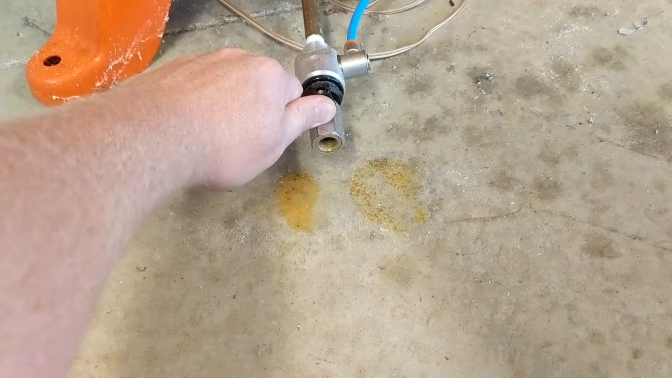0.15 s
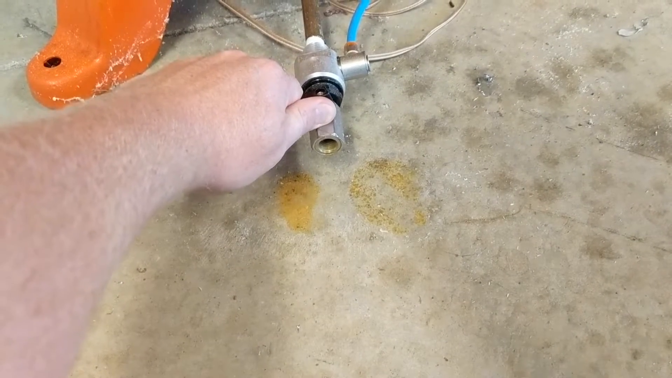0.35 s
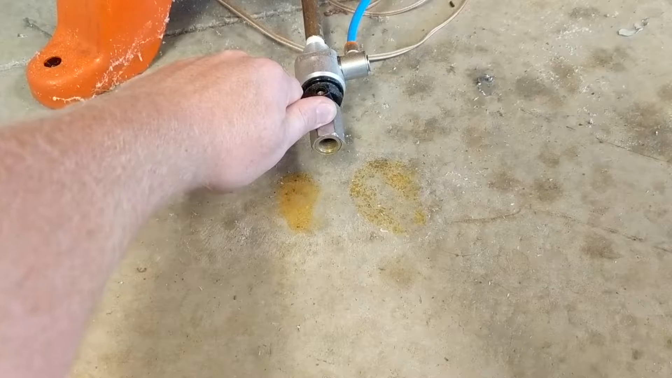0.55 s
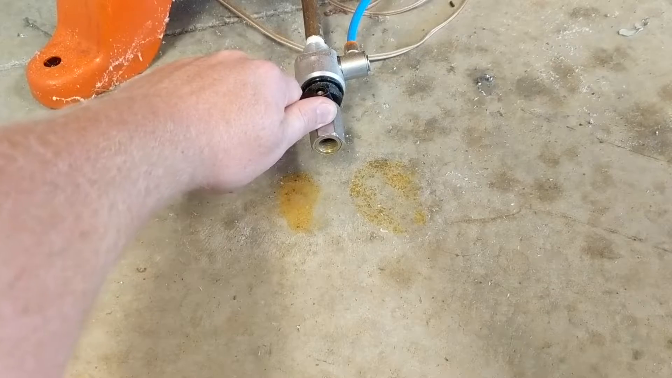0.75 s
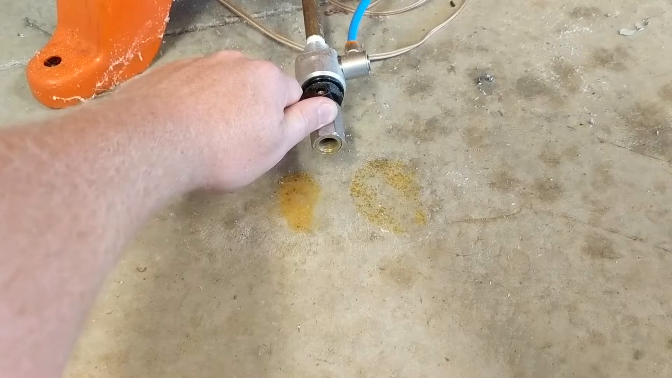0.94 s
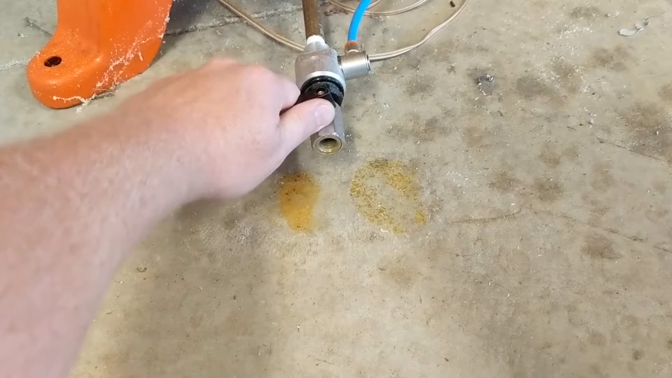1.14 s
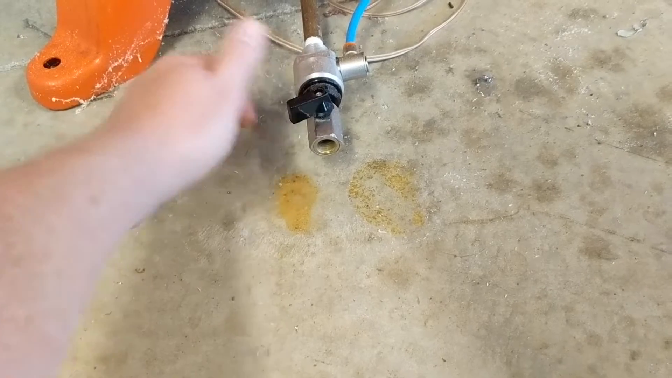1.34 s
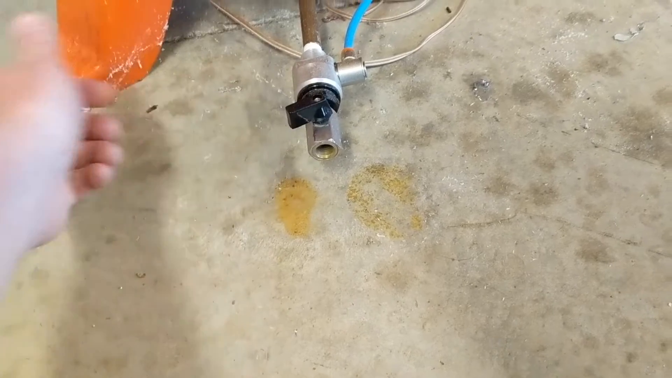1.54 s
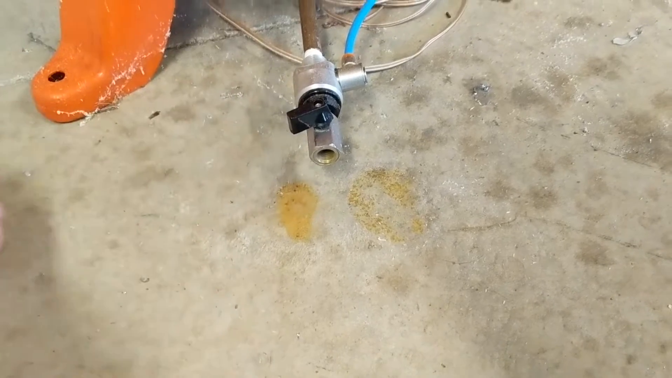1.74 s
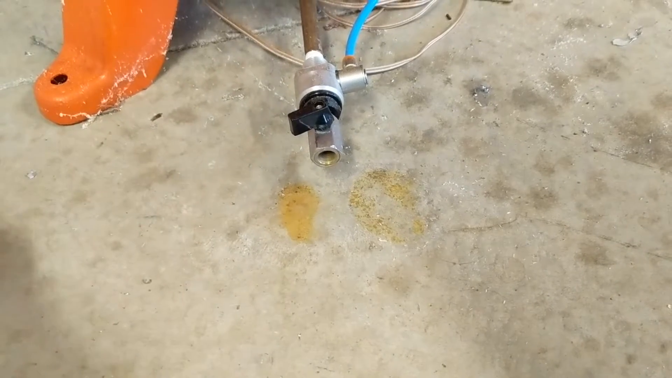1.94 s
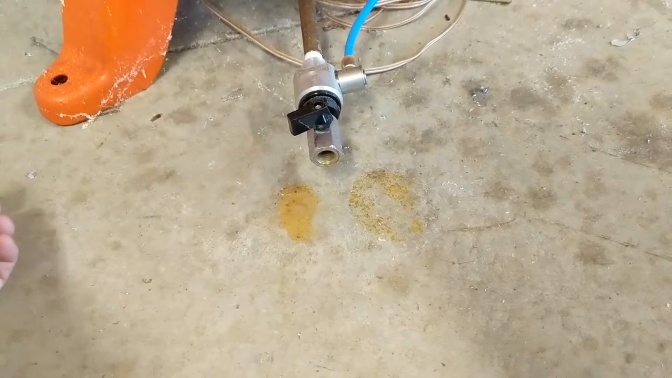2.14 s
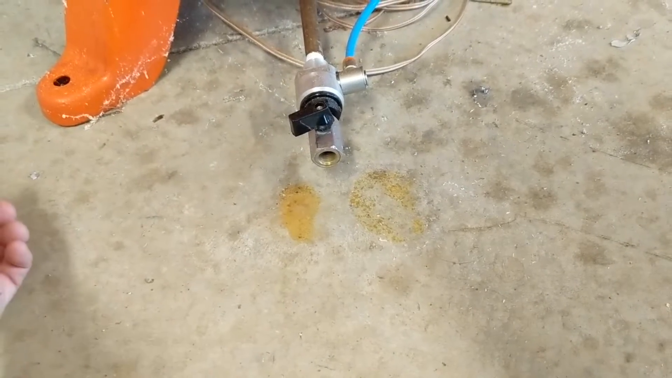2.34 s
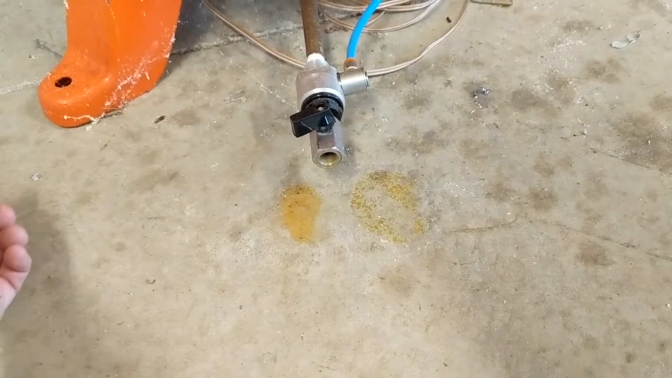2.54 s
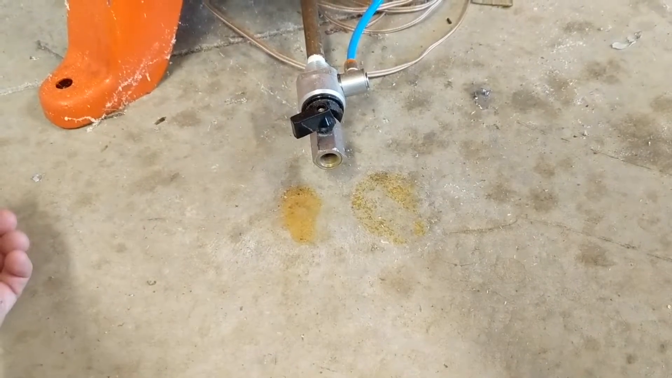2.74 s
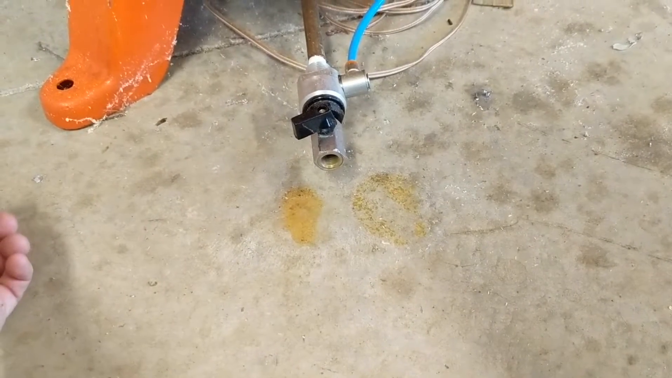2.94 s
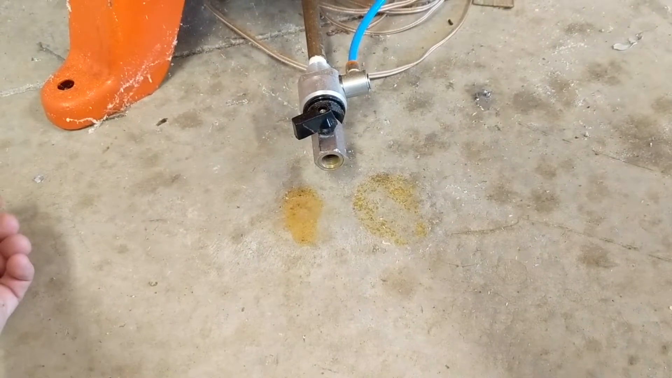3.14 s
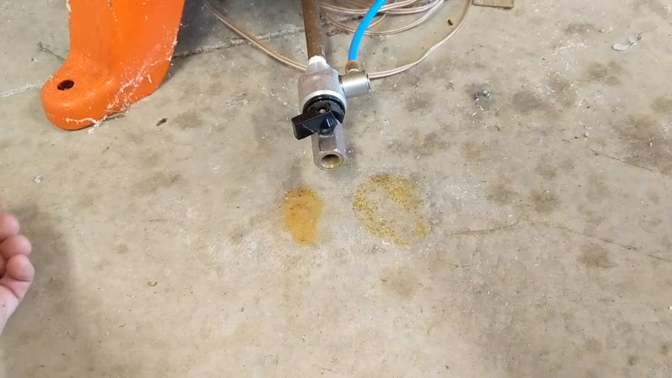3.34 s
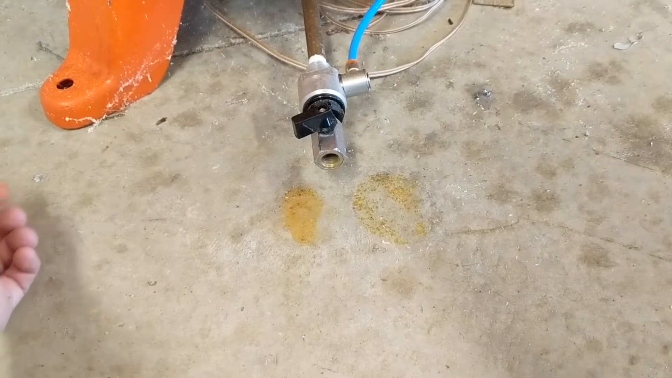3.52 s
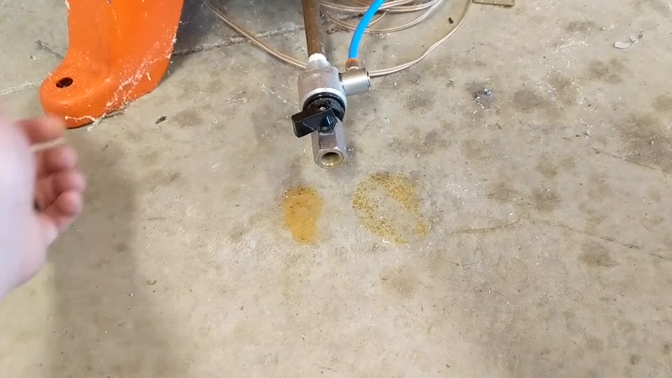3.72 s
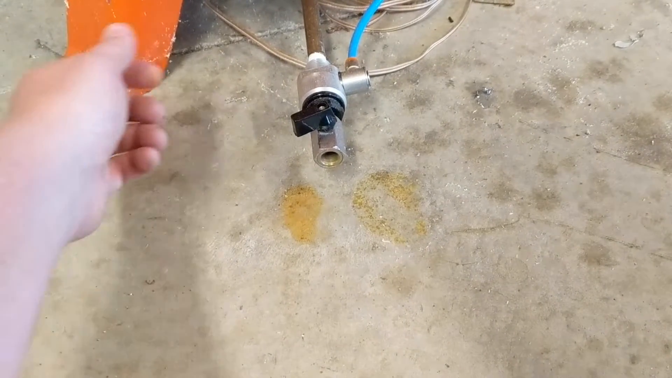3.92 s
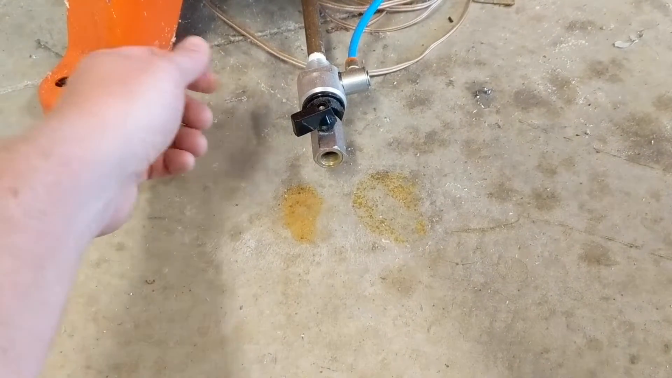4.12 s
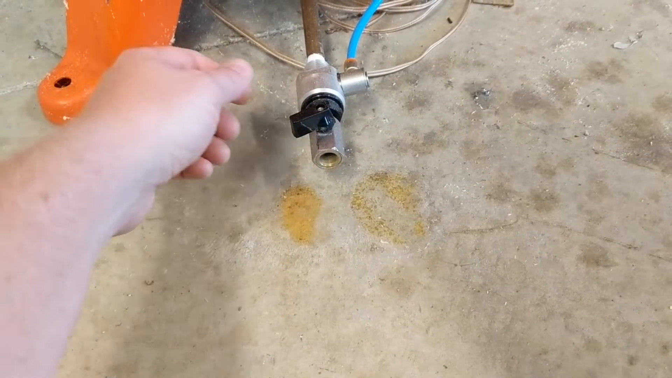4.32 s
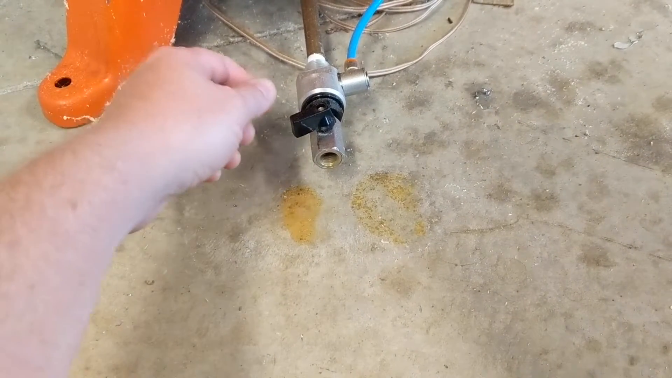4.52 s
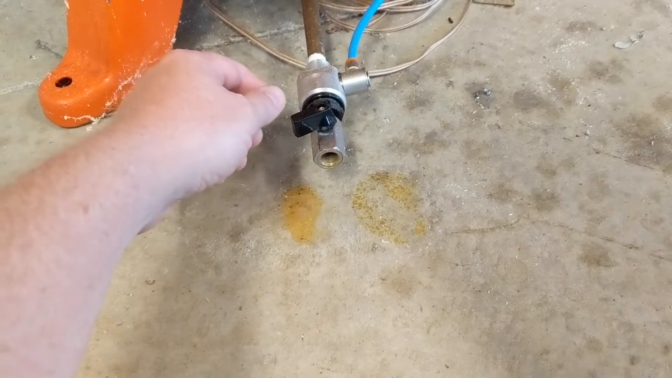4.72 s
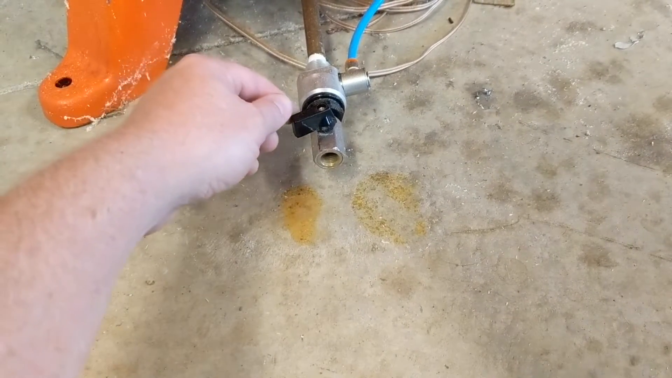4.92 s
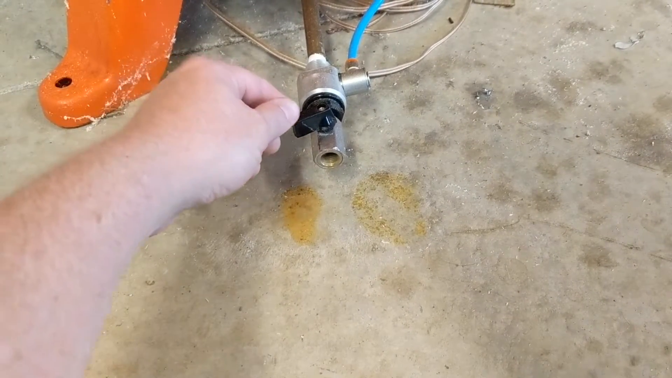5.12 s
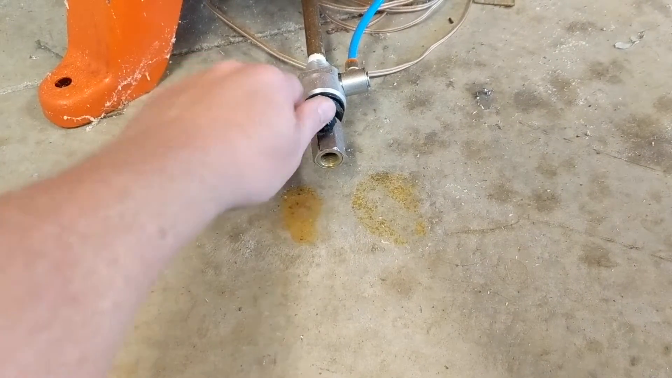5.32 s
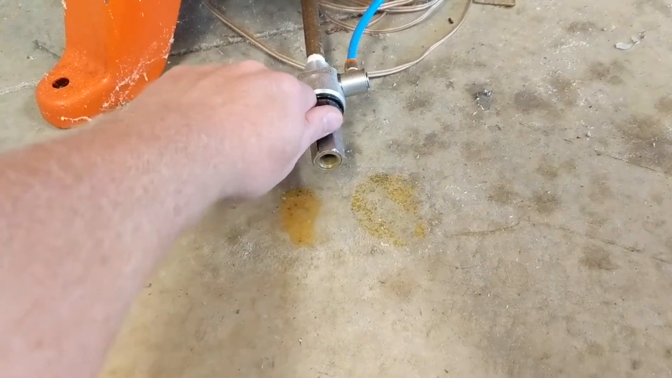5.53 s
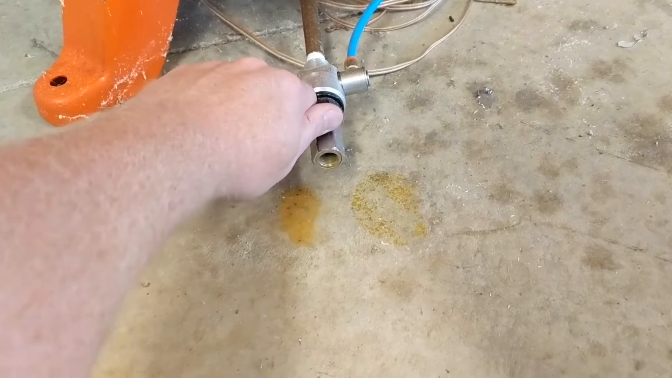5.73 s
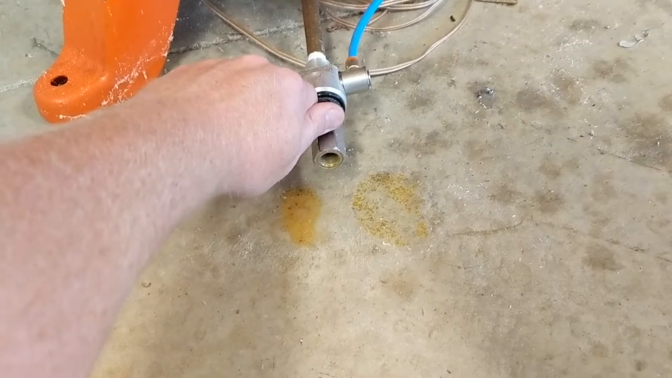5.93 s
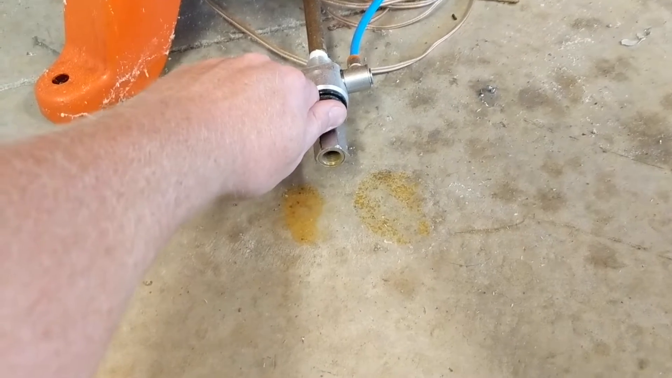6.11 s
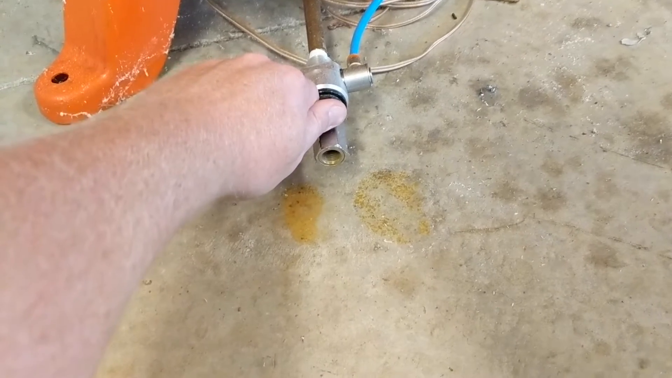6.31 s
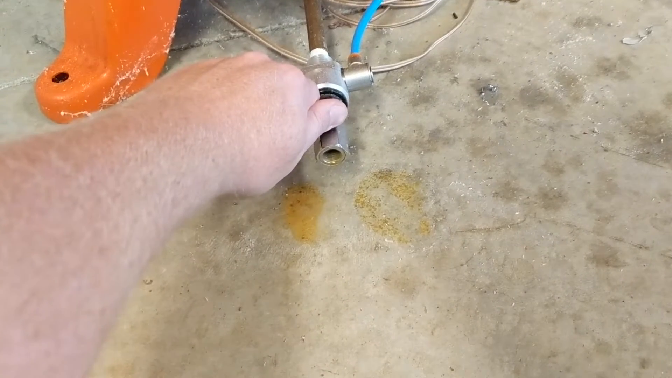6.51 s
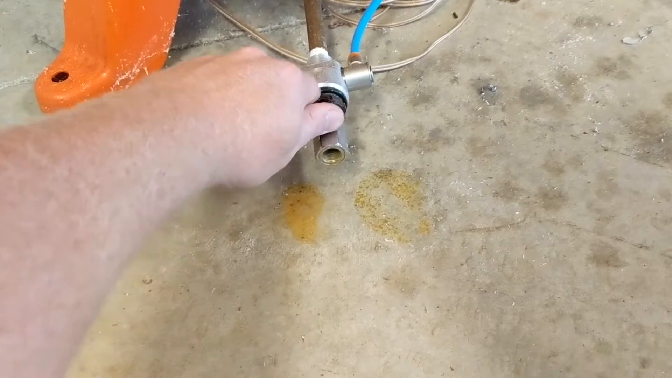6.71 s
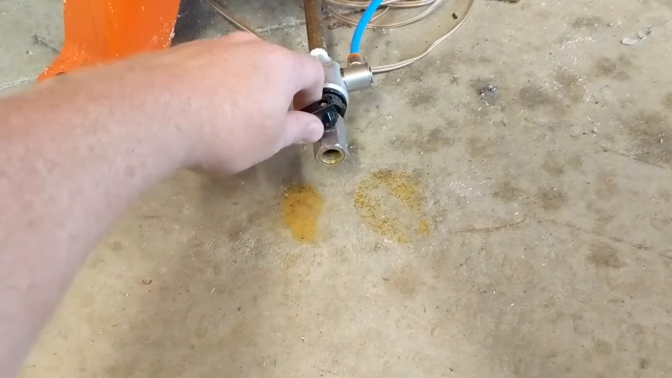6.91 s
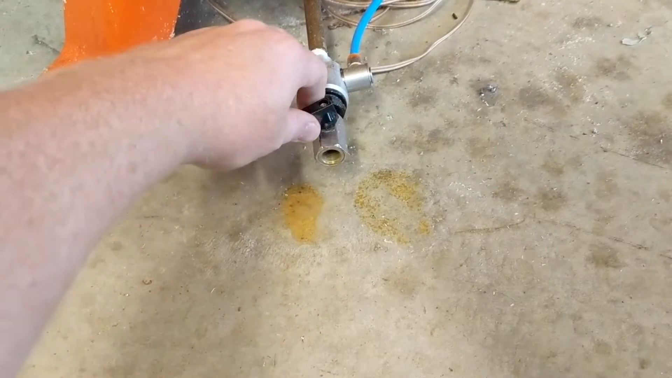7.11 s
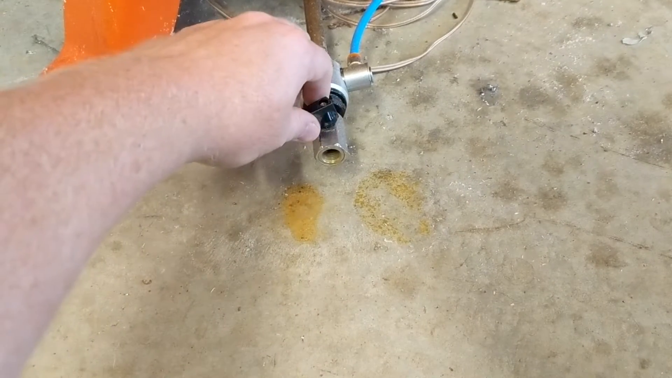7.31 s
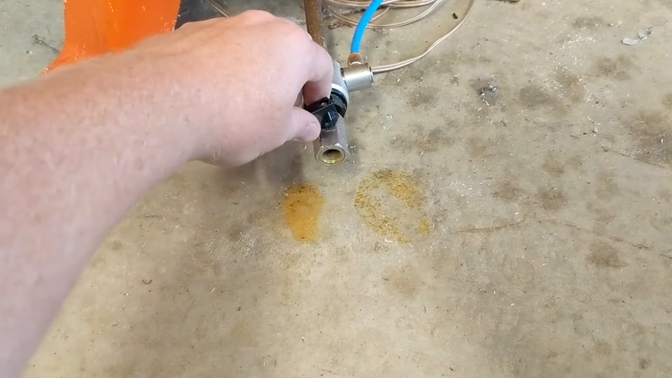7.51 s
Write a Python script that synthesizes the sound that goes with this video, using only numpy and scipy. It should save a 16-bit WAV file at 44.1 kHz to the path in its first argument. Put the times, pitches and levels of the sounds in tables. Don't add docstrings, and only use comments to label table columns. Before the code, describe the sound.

A close, bright hiss of escaping air bursts from a short pipe, holds steady, then jumps louder and sputters in gusts.

```python
import sys
import numpy as np
from scipy import signal
from scipy.fft import rfft, irfft, next_fast_len
from scipy.io import wavfile
from scipy.ndimage import uniform_filter1d

SR = 44100
rng = np.random.default_rng(int(sys.argv[2]) if len(sys.argv) > 2 else 0)


def inscribe(sig):
    pcm = np.round(np.clip(np.atleast_2d(sig).T, -1, 1) * 32767)
    wavfile.write(sys.argv[1], SR, pcm.astype(np.int16))


def invert_db(level):
    return 10 ** (np.asarray(level, dtype=float) / 20)


N = 337760


def jet():
    # time_s, level_db
    valve = [(0, -88), (.06, -62), (.12, -57.5), (.27, -40), (.31, -31.5), (.43, -27.5), (.65, -31),
             (1.4, -30), (1.9, -30.5), (3.1, -32), (3.62, -30.5), (4.1, -31.5), (4.5, -29.5), (5.95, -28),
             (6.11, -29), (6.15, -22), (7.66, -22.5)]
    # time_s, lift_db, length_ms
    swells = [(.58, 3, 32), (.85, 1.5, 60), (1.52, -4.5, 32), (1.76, 1.5, 85), (2.42, 1, 160),
              (3.74, 3.5, 70), (3.915, 3, 35), (3.96, -4.5, 15), (4.04, -4, 31), (6.01, -4.5, 22),
              (6.5, -1.5, 26), (6.8, 0.5, 80), (7.48, 1, 35)]
    # start_s, shear_minus_pipe_db, fine_minus_pipe_db
    poses = [(0, -1, -16.5), (.09, 0.5, -8), (.2, -3.5, -11), (.28, -12, -25.5), (.61, -10, -22.5),
             (1.4, -11, -17), (1.5, -6, -16), (1.6, -9, -19), (1.69, -7, -18.5), (1.78, -11, -20),
             (3.68, -8.5, -19), (3.92, -6.5, -19), (4.09, -7, -15), (4.42, -12, -18.5), (5.3, -7.5, -21.5),
             (6.17, -3, -18), (6.58, -2.5, -18), (6.87, -5, -17.5)]
    # frequency_hz, level_db_per_hz
    pipe_colour = [(2900.0, -36.0), (3060.0, -18.0), (3169.0, -13.4), (3514.0, -8.1), (4065.0, -2.2),
                   (4478.0, 0.0), (4680.0, -1.5), (4823.0, -9.0), (4990.0, -1.5), (5305.0, -2.9),
                   (5443.0, -5.5), (5719.0, -6.0), (6201.0, -13.6), (6401.0, -26.0)]
    # frequency_hz, level_db_per_hz
    shear_colour = [(6070, -16), (6270, -3.5), (6683, -1.6), (7028, -2.3), (7235, -4.7), (7924, -1.4),
                    (8062, -2.8), (8337, -0.6), (8544, -2.5), (8751, 0.0), (8888, -2.2), (9440, -4.9),
                    (9715, -11.2), (9915, -23)]
    # frequency_hz, level_db_per_hz
    fine_colour = [(9584, -13), (9784, -0.9), (10129, -4.1), (10542, 0.0), (10818, -0.7), (12403, -10.1),
                   (13161, -3.6), (13574, -3.6), (13781, -8.6), (13919, -5.8), (14608, -4.2), (14952, -6.7),
                   (15641, -1.9), (15731, -2)]
    pose_slew_s = 0.052

    start_s, *held_db = np.transpose(poses)
    pose = np.maximum(np.searchsorted(start_s, np.arange(N) / SR) - 1, 0)
    shear_db, fine_db = (uniform_filter1d(db[pose], int(pose_slew_s * SR)) for db in held_db)

    eddies, flutter = walk(30), walk(250)
    pipe = coloured(pipe_colour) * invert_db(0.7 * eddies + 0.86 * flutter + 0.4 * walk(15))
    shear = coloured(shear_colour) * invert_db(shear_db + 0.47 * eddies + 1.25 * flutter + 0.74 * walk(12))
    fine = coloured(fine_colour) * invert_db(fine_db + 0.32 * eddies + 0.37 * flutter + 0.53 * walk(9.3))
    opening_db = columns(valve)[0]
    return invert_db(opening_db + bells(swells)) * (pipe + shear + fine)


def whistle():
    # time_s, level_db
    loudness = [
        (0, -85),
        (.05, -63),
        (.15, -56),
        (.25, -47),
        (.35, -46),
        (.6, -48),
        (1, -55),
        (1.3, -90),
    ]
    hz, width = 4450, 170
    tone = coloured([(hz - 2 * width, -20), (hz - width / 2, -3), (hz, 0), (hz + width / 2, -3),
                     (hz + 2 * width, -20)])
    return tone * invert_db(columns(loudness)[0])


def close_echoes(x):
    # start_s, end_s, delay_ms, reflected_share
    hand = [(0, 1.04, 0.358, -0.16), (0.28, 2.2, 0.254, 0.16), (0.32, 2.24, 0.446, -0.08),
            (0.52, 1.8, 0.15, 0.1), (1.44, 1.56, 0.15, -0.23), (1.44, 2.36, 0.334, 0.13),
            (1.56, 2.32, 0.406, 0.11), (1.72, 3.68, 0.21, 0.18), (2.16, 8, 0.274, -0.07),
            (2.32, 3.68, 0.302, 0.16), (2.36, 3.72, 0.522, 0.09), (2.36, 3.76, 0.382, 0.11),
            (2.64, 6.56, 0.334, -0.05), (3.68, 4.08, 0.15, 0.15), (4.0, 4.84, 0.418, 0.12),
            (4.04, 4.32, 0.302, 0.12), (4.04, 4.92, 0.258, 0.2), (4.12, 5.52, 0.67, 0.13),
            (4.12, 6.56, 0.15, -0.1), (4.32, 6.32, 0.182, 0.09), (4.48, 5.44, 0.346, 0.17),
            (4.64, 6.96, 0.63, -0.14), (5.44, 6.12, 0.502, -0.13), (5.88, 6.84, 0.202, -0.18),
            (5.92, 6.96, 0.47, -0.09), (6.16, 7.16, 0.37, 0.09), (6.28, 8, 0.226, -0.23),
            (6.4, 6.8, 0.266, -0.1), (6.72, 8, 0.286, -0.14), (6.88, 7.48, 0.33, 0.1)]
    # start_s, end_s, delay_ms, reflected_share
    floor = [(0, 0.96, 1.126, 0.08), (0, 1.32, 1.446, -0.09), (0, 1.36, 2.01, 0.09),
             (0, 1.64, 1.706, -0.07), (0, 6.52, 1.17, 0.04), (0, 8, 3.106, 0.06), (0, 8, 3.39, -0.06),
             (0.32, 1.2, 2.198, 0.08), (1.32, 3.56, 0.67, 0.07), (1.56, 1.8, 1.55, -0.14),
             (1.56, 5.72, 3.354, -0.04), (1.56, 7.44, 3.19, -0.02), (1.76, 3.92, 1.63, -0.08),
             (1.92, 8, 3.654, 0.03), (2.0, 4.48, 1.81, -0.09), (2.2, 3.68, 1.206, -0.14),
             (2.32, 3.8, 0.862, 0.1), (2.32, 4.04, 1.33, -0.08), (2.4, 3.88, 1.466, -0.07),
             (3.2, 8, 0.918, -0.03), (3.56, 6.8, 1.358, 0.06), (3.72, 8, 1.462, 0.03),
             (4.04, 4.44, 0.886, 0.13), (4.28, 7.36, 1.738, -0.04), (4.44, 7.0, 2.018, 0.06),
             (5.4, 8, 2.166, -0.05), (5.44, 8, 1.546, -0.06), (6.12, 7.6, 1.218, 0.07),
             (6.92, 7.52, 1.258, 0.07), (7.12, 8, 0.71, -0.11)]
    fade_s = 2 * .022

    out = x.copy()
    taps = np.arange(-32, 256)
    for start, end, ms, share in [*hand, *floor]:
        a = max(int((start - fade_s) * SR), 0)
        b = min(int((end + fade_s) * SR), N)
        lag = taps - ms * SR / 1000
        delay = np.sinc(lag) * np.exp(-(lag / 12) ** 2)
        late = signal.oaconvolve(x[a:b], delay)[32:32 + b - a]
        out[a:b] += share * span(start, end, fade_s)[a:b] * late
    return out


def walls(x):
    t60_s, level_db = 0.078, -13.5
    t = np.arange(8192) / SR
    decay = np.exp(-np.log(1000) * t / t60_s)
    tail = rng.standard_normal(8192) * decay * (t > .003)
    return x + signal.fftconvolve(x, invert_db(level_db) * tail / np.linalg.norm(tail))[:N]


def rush():
    # time_s, level_db, tilt_db
    course = [(0, -86, -6), (.12, -82, -3), (.22, -65, 1), (.3, -53.5, 14), (.4, -49.5, 3.5), (1.2, -49, 3),
              (1.45, -46, 3), (2.3, -49, 1), (3.6, -48.5, 1.5), (4.6, -49.5, 1), (5.7, -50, 1.5),
              (6.11, -49, 0), (6.15, -39, -1.5), (6.75, -37, -1.5), (7.05, -41, -1.5), (7.66, -42, -1.5)]
    # start_s, end_s, first_lift_db, last_lift_db
    gusts = [
        (3.682, 3.776, -5, -3),
        (4.076, 4.284, 5, 2),
        (6.204, 6.405, 4.5, 6),
        (6.413, 6.57, 2, 5.5),
        (6.6, 6.691, 2, 6.5),
        (6.92, 6.998, -0.5, 6),
        (7.253, 7.36, 7.5, 1),
        (7.463, 7.569, 3.5, 8),
    ]
    # time_s, lift_db, length_ms
    spits = [
        (4.13, 3, 8.3),
        (4.185, 3, 6.1),
        (6.143, 2, 7.1),
        (6.495, 3.5, 4.4),
        (6.672, -5, 4.3),
        (6.86, 5.5, 5.8),
        (7.04, 5, 4.3),
        (7.474, 3.5, 6.5),
    ]
    # frequency_hz, level_db_per_hz
    stream_colour = [(25, -34), (45, -5), (70, -0.5), (200, 0), (1000, 0), (1800, 1), (2900, 2.5),
                     (3400, -6.5), (6000, -3)]

    level_db, tilt_db = columns(course)
    t = np.arange(N) / SR
    gusts_db = 0
    for start, end, first, last in gusts:
        gusts_db = gusts_db + span(start, end, 0.016) * np.interp(t, [start, end], [first, last])

    stream = coloured(stream_colour)
    bass = signal.sosfilt(signal.butter(2, 1550, fs=SR, output="sos"), stream)
    shared_db = 0.67 * walk(30) + bells(spits)
    sputter = invert_db(shared_db + 2.0 * walk(70) - 1.61 * tilt_db)
    upper = (stream - bass) * invert_db(shared_db + 1.0 * walk(150))
    return invert_db(level_db + gusts_db + 2.0) * (bass * sputter + upper)


def bumps():
    # time_s, signed_peak, push_ms
    pushes = [
        (.3549, -.035, .7),
        (.4046, .021, .55),
        (3.9118, .011, .9),
        (3.950, -.014, 1.1),
        (6.142, -.03, 1.2),
    ]
    out = np.zeros(N)
    for s, peak, push_ms in pushes:
        t = (np.arange(-300, 900) / SR) / (push_ms / 1000)
        i = int(s * SR)
        out[i - 300:i + 900] += peak * np.where(t < 0, np.exp(-12 * t ** 2), np.exp(-np.abs(t) / 2))
    return out


def low_cut(x):
    cut_hz, width_hz = 61, 34
    w, damp = 2 * np.pi * cut_hz, 2 * np.pi * width_hz
    return signal.lfilter(*signal.bilinear([1, 0, 0], [1, damp, w ** 2], SR), x)


def garage():
    # frequency_hz, level_db_rms
    hum_tones = [
        (59.5, -72),
        (119, -80),
    ]
    # frequency_hz, level_db_per_hz
    room_colour = [(18, -32), (30, -3), (98, -6), (157, -6), (2410, -44), (4420, -34), (4780, -26),
                   (7870, -24), (16000, -47)]
    # time_s, gain_db
    settle = [
        (0, 2),
        (.3, 1),
        (.5, -22),
        (7.66, -9),
    ]
    t = np.arange(N) / SR
    hum = np.zeros(N)
    for hz, db in hum_tones:
        hum += np.sqrt(2) * invert_db(db + 2.0 * walk(11)) * np.sin(2 * np.pi * hz * t)
    room = invert_db(-78) * coloured(room_colour)
    return (hum + room) * invert_db(columns(settle)[0])


def coloured(points):
    hz, db = np.transpose(points)
    size = next_fast_len(N)
    f = np.arange(1, size // 2 + 2) * SR / size
    gain = invert_db(np.interp(np.log(f), np.log(hz), db, left=-90, right=-90))
    x = irfft(rfft(rng.standard_normal(size)) * gain, size)[:N]
    return x / np.std(x)


def walk(rate):
    k = int(SR / rate)
    held = np.repeat(rng.standard_normal(N // 20)[:N // k + 1], k)
    return 0.93 * uniform_filter1d(uniform_filter1d(held, k), k)[:N]


def columns(table):
    s, *values = np.transpose(table)
    return [np.interp(np.arange(N) / SR, s, v) for v in values]


def bells(events):
    t = np.arange(N) / SR
    return sum(db * np.exp(-((t - s) * 1000 / ms) ** 2) for s, db, ms in events)


def span(start, end, edge_s):
    t = np.arange(N) / SR
    since_start = t - start if start > 0 else np.inf
    return np.clip(np.minimum(since_start, end - t) / edge_s + .5, 0, 1)


def scene():
    hiss = walls(close_echoes(jet()) + whistle())
    mono = hiss + rush() + garage() + low_cut(bumps())
    return np.array([mono, mono])


def treble_gate(x):
    from_hz, top_hz, threshold_db = 9800, 15740, -7.5
    hz, _, z = signal.stft(x, SR, nperseg=2048, noverlap=1536)
    top = (hz > from_hz) & (hz < top_hz)
    power = uniform_filter1d(uniform_filter1d(np.abs(z[top]) ** 2, size=8, axis=0), size=3, axis=1)
    z[top] *= power > invert_db(2 * threshold_db) * power.mean(axis=0)
    z[hz >= top_hz] = 0
    return signal.istft(z, SR, nperseg=2048, noverlap=1536)[1][:N]


def low_pass(x):
    return signal.sosfilt(signal.butter(12, 16990, fs=SR, output="sos"), x)


def record(dry):
    ceiling = .6
    mono = treble_gate(ceiling * np.tanh(dry[0] / ceiling))
    return low_pass(np.array([mono, mono]))


dry = scene()
out = record(dry)
inscribe(out)
```